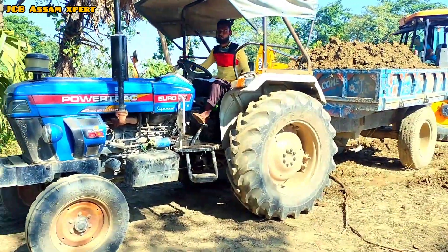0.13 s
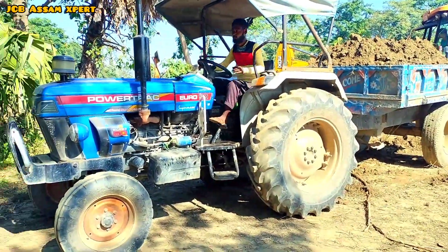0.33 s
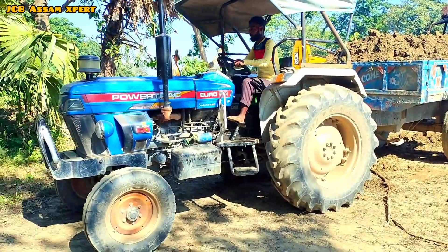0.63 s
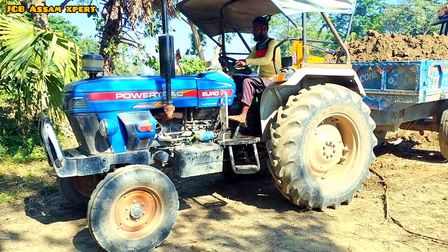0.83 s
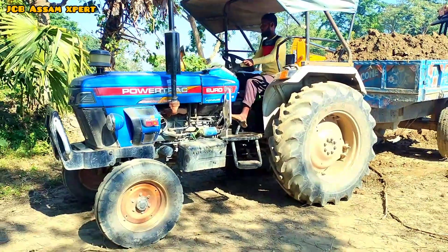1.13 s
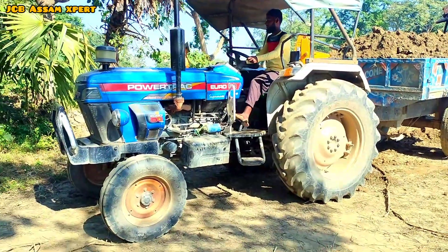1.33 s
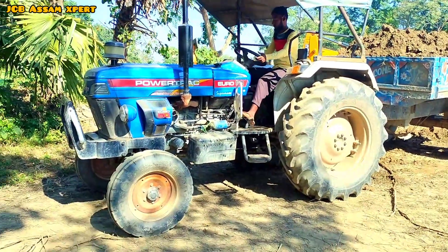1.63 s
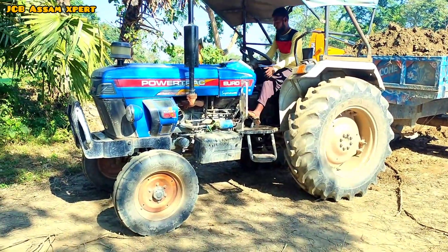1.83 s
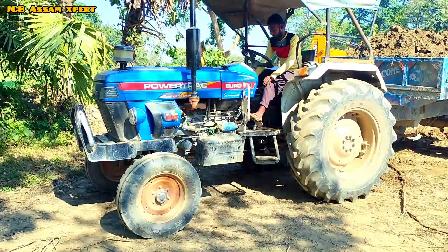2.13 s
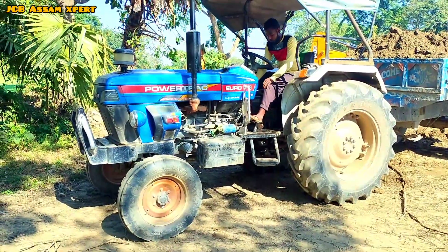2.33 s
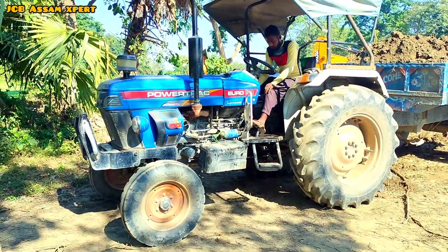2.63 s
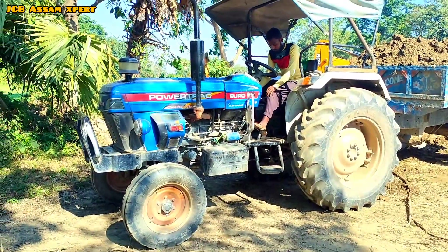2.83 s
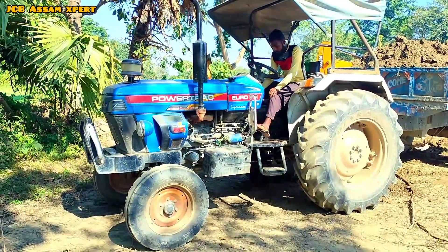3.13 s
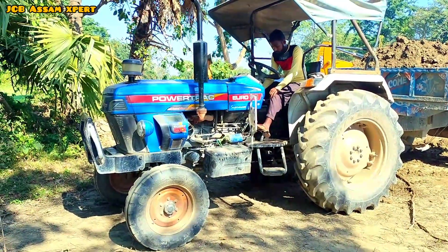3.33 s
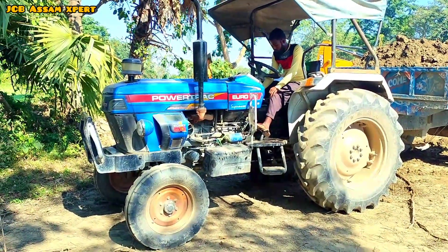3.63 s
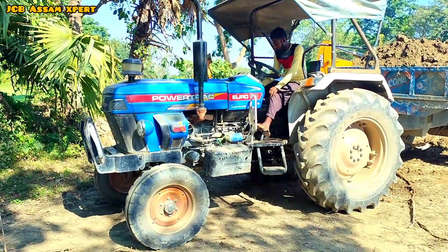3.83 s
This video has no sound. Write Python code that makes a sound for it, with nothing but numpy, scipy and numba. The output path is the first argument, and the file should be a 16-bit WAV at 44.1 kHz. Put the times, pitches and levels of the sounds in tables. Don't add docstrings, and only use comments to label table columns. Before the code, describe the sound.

A diesel tractor is started in an open yard, heard from a few metres. From 0 to 1.8 s, levers and sheet metal knock and scrape irregularly over a faint far machine's thuds and whine, with tiny squeaks. A quieter gap follows. At 2.7 s a solenoid slams; the starter whine climbs, then sags by 3.0. From 3.1 s loud exhaust bangs, hissing puffs and clanks quicken, easing around 3.55 into lumpy idle.

```python
import sys
import numpy as np
from scipy import signal
from scipy.fft import rfft, irfft, next_fast_len
from scipy.io import wavfile
from scipy.ndimage import uniform_filter1d
from numba import njit

SR = 44100
rng = np.random.default_rng(int(sys.argv[2]) if len(sys.argv) > 2 else 0)


def file_out(sig):
    cols = np.atleast_2d(sig).T
    lim = np.clip(cols, -1, 1)
    pcm = np.round(lim * 32767).astype(np.int16)
    wavfile.write(sys.argv[1], SR, pcm)


def boost(x):
    u = np.asarray(x, float) / 20
    return 10 ** u


N = 176400
T = np.arange(N) / SR

# start_s, peak_db
FAR_THUDS = [(0.154, -46), (0.357, -55), (0.552, -49), (0.799, -42), (1.071, -57), (1.159, -46),
             (1.339, -58), (1.491, -43), (1.686, -41), (1.838, -44), (1.947, -42), (2.048, -43),
             (2.271, -47)]
# centre_hz, width_hz, level_db
FAR_WHINE = [(680, 89, -70), (1140, 90, -75.5), (1433, 66, -78), (1766, 92, -73.5)]
# time_s, pitch_hz, level_db
FAR_TONE = [
    (1.82, 1144, -88),
    (1.9, 1120, -69),
    (2.25, 1054, -71.5),
    (2.32, 1110, -73),
    (2.7, 1087, -77),
]
# freq_hz, density_db (per Hz)
YARD_COLOUR = [(15, -32), (25, -6.5), (59, 0.5), (420, -25.5), (863, -25.5), (1900, -33), (2600, -40),
               (16000, -45)]
YARD_DB, YARD_PAN_DB = -49.5, 1.2

# start_s, peak_db, brightness_db
RATTLES = [(0.089, -33.5, -18), (0.239, -56.5, 2.5), (0.327, -55, 5.5), (0.354, -29.5, -16.5),
           (0.378, -33, -38), (0.437, -37.5, -21), (0.539, -44, -25), (0.588, -40, -12), (0.664, -45.5, 2),
           (0.7, -32.5, -8), (0.74, -32, -7), (0.816, -26.5, -17), (0.861, -33, -44), (0.899, -45, 3.5),
           (0.94, -35.5, -5), (0.972, -32.5, -21), (1.048, -30, -19), (1.079, -23, -20), (1.168, -27, -60),
           (1.37, -32, -46), (1.405, -37, -37), (1.434, -55, 4.5), (1.473, -46, -6), (1.509, -37.5, -7.5),
           (1.571, -33.5, -11.5), (1.669, -37.5, 1), (1.702, -33.5, -18)]
# time_s, level_db
EFFORT = [(0, -66.5), (.3, -62.5), (.4, -54), (.5, -63), (.64, -71), (.7, -50), (1.2, -47.5), (1.27, -67),
          (1.36, -60), (1.4, -56.5), (1.72, -62), (1.85, -66)]
# centre_hz, width_hz, level_db
BODY = [(237, 89, -5.5), (523, 570, -4.5), (720, 53, -2), (1150, 55, -17.5), (1860, 55, -14)]
# centre_hz, width_hz, level_db
LINKAGE = [(1315, 56, 0), (1800, 51, -2), (2350, 130, -9.5), (3110, 76, -16), (3480, 83, -14),
           (4320, 35, -14), (7100, 69, -25)]
# start_s, peak_db, ring_hz
PANEL_BLOWS = [(.091, -44, 564), (.381, -34, 678), (.704, -41.5, 1766), (.745, -52, 740), (.82, -33, 647),
               (.822, -35.5, 351), (.863, -33, 682), (.973, -34, 720), (1.05, -34.5, 680),
               (1.079, -33, 720), (1.09, -33, 530), (1.171, -42, 736), (1.2, -42, 962), (1.372, -41, 396),
               (1.402, -43, 738), (1.575, -47.5, 1796), (1.672, -43, 560), (1.682, -31.5, 333),
               (1.705, -40.5, 758)]
RATTLE_ATTACK_S = 0.005

# start_s, length_s, from_hz, to_hz, level_db
SQUEAKS = [
    (.595, .06, 3600, 3550, -70),
    (1.31, .04, 4200, 4250, -71),
    (1.94, .1, 6200, 7900, -81),
    (2.04, .12, 8000, 7000, -80),
    (2.27, .03, 3900, 3200, -79),
    (2.36, .03, 3800, 2700, -78),
    (2.4, .03, 4500, 3000, -78),
]

# start_s, peak_db, decay_s
ENGAGING = [
    (2.709, -30.5, 0.0075),
    (2.713, -23.5, 0.024),
    (2.73, -11.5, 0.018),
]
# start_s, peak_db
LURCHES = [
    (2.76, -18),
    (2.77, -18.5),
    (2.779, -20),
    (2.795, -18),
    (2.81, -20),
    (2.83, -34),
]
# time_s, gear_mesh_hz, whine_db, clatter_db
STARTER = [(2.731, 700, -34.5, -28), (2.785, 770.6, -20.5, -26.5), (2.81, 850, -26.5, -25),
           (2.86, 1031, -24, -23), (2.915, 1250, -28, -21.5), (2.958, 1038, -18.5, -21.5),
           (2.973, 915, -15, -26), (2.982, 842, -16.5, -26.5), (2.992, 790, -13.5, -26),
           (3.015, 680, -36, -28), (3.16, 644, -66, -29)]
# centre_hz, width_hz, level_db
HOUSING = [(790, 170, 9), (1450, 117, 6), (1940, 88, -6), (3260, 250, -11.5), (4010, 150, -8),
           (4560, 90, -16), (5470, 200, -17), (6550, 260, -11.5)]
SNAGS_S = (2.803, 2.824)
SNAG_WIDTH_S, SNAG_DB = 0.0022, 12.5
GEAR_RING_HZ, GEAR_RING_WIDTH_HZ, GEAR_ROUGH_DB, TEETH_DB = 830, 500, 2.5, -12

# crest_s, thump_db, puff_db
BEATS = [(3.139, -19.5, -21), (3.258, -14.5, -7.5), (3.343, -11, -4), (3.416, -10, -7), (3.479, -10.5, -11),
         (3.547, -26, -29.5), (3.591, -22, -35), (3.661, -25, -35.5), (3.729, -16, -21.5),
         (3.792, -21, -54), (3.857, -14.5, -22), (3.915, -16.5, -29)]
# centre_hz, width_hz, level_db
STACK = [(2510, 81, -0.5), (2747, 38, 1), (3160, 55, -6), (3380, 75, -11), (4160, 180, -13),
         (5360, 130, -17), (6200, 48, -18), (7080, 160, 4)]
THUMP_HZ, THUMP_WIDTH_S = 55.6, 0.0086
PUFF_LEAD_S, PUFF_ATTACK_S, PUFF_DECAY_S = 0.013, 0.007, 0.0058
# start_s, peak_db, brightness_db
KNOCKS = [(3.161, -6.5, -4.5), (3.212, -18, 4.5), (3.267, -9.5, -9), (3.348, -9.5, -36), (3.419, -9.5, -37),
          (3.599, -25, -9), (3.665, -16.5, -26), (3.73, -21.5, -31), (3.795, -11, -47), (3.853, -17, -38),
          (3.915, -20, -29), (3.978, -33, -29)]
# centre_hz, width_hz, level_db
BLOCK = [(128, 11, 0), (330, 18, 11.5), (495, 11, 6.5), (676, 116, 5), (860, 45, -6), (1350, 84, 1),
         (1890, 160, -16), (2430, 19, -21)]
KNOCK_ATTACK_S, KNOCK_DECAY_S = 0.004, 0.026
# start_s, peak_db, ring_hz
CLANKS = [(3.158, -24, 1953), (3.166, -17, 775), (3.216, -27, 1450), (3.249, -20.5, 2614),
          (3.272, -19.5, 1385), (3.274, -27, 2450), (3.285, -17, 330), (3.334, -15, 1596),
          (3.351, -19.5, 2525), (3.358, -15, 940), (3.402, -19, 2350), (3.414, -29, 3100),
          (3.422, -17, 1333), (3.43, -19.5, 637), (3.45, -16.5, 630), (3.606, -32, 320),
          (3.669, -27.5, 1385), (3.685, -20.5, 343), (3.733, -25, 650), (3.796, -14.5, 630),
          (3.806, -19.5, 247), (3.865, -16, 330), (3.9, -21.5, 283), (3.92, -29, 640), (3.978, -33, 330)]
# time_s, level_db
RUNNING = [
    (3.1, -29),
    (3.45, -18),
    (3.55, -24),
    (4, -24.5),
]
# freq_hz, density_db (per Hz)
RUMBLE = [(15, -35), (25, -33), (55, -3), (427, -12), (641, -13), (1100, -17.5), (4000, -32),
          (16000, -55.5)]

SPREAD_HZ, SCATTER_S = 3660, 0.025
YARD_T60_S, YARD_WET_DB = 0.26, -11
# freq_hz, gain_db
MIC = [(6000, -1), (7600, -2), (9200, -9), (12500, -2), (16000, -2)]


@njit
def svf(x, hz, width):
    y, band, low = np.empty(len(x)), 0., 0.
    g, k = np.tan(np.pi * hz / SR), width / hz
    for i in range(len(x)):
        v = (band + g * (x[i] - low)) / (1 + g * (g + k))
        band, low, y[i] = 2 * v - band, low + 2 * g * v, k * v
    return y


def unit(x):
    return x / np.sqrt(np.mean(x ** 2))


def noise(hz, width):
    return unit(svf(rng.standard_normal(N), 1. * hz, 1. * width))


def grit(scatter_db):
    size_db = scatter_db * np.minimum(rng.exponential(size=N), 5)
    return unit(rng.standard_normal(N) * boost(size_db))


def walk(rate):
    hold = int(SR / rate)
    steps = np.repeat(rng.standard_normal(N // hold + 1), hold)
    return 1.5 * uniform_filter1d(uniform_filter1d(steps, hold), hold)[:N]


def curve(rows, column=1):
    return np.interp(T, [r[0] for r in rows], [r[column] for r in rows])


def bursts(times, dbs, decays, attack):
    out = np.zeros(N)
    for start, db, decay in zip(times, dbs, np.broadcast_to(decays, len(times))):
        i = int(start * SR) + 1
        u = T[i:i + SR // 2] - start
        out[i:i + SR // 2] += boost(db) * (1 - np.exp(-u / attack)) * np.exp(-u / max(decay, .001))
    return out


def thumps(rows, hz, width):
    out = np.zeros(N)
    for r in rows:
        centre = int(r[0] * SR)
        i = slice(max(centre - SR // 10, 0), centre + SR // 10)
        u = T[i] - r[0]
        out[i] += boost(r[1]) * np.cos(2 * np.pi * hz * u) * np.exp(-(u / width) ** 2 / 2)
    return out


def ring(x, peaks, widen, broad_db, broad_hz):
    def wide(v):
        return svf(v, 1. * broad_hz, 2.09 * broad_hz)

    def metal(v):
        modes = sum(boost(db) * svf(v, 1. * hz, widen * width) for hz, width, db in peaks)
        return wide(boost(broad_db) * wide(v) + modes)

    return metal(x) / np.std(metal(rng.standard_normal(20000)))


def coloured(points, flicker_db, rate):
    hz, db = np.array(points).T
    out = np.zeros(N)
    for f in 28 * 2 ** np.arange(0, 9.3, .5):
        level = boost(np.interp(np.log(f), np.log(hz), db) + flicker_db * walk(rate))
        out += level * svf(svf(rng.standard_normal(N), f, f / 2), f, f / 2)
    return unit(out)


def panels(rows, width, attack, decay):
    out, u = np.zeros(N + SR), np.arange(SR // 8) / SR
    push = (1 - np.exp(-u / attack)) ** 2 * np.exp(-u / decay)
    for (start, db, hz), rough in zip(rows, rng.standard_normal((len(rows), len(u)))):
        strike = rough + np.sin(2 * np.pi * hz * u) / 10
        tone = unit(svf(strike, 1. * hz, width * np.sqrt(hz)))
        i = int(start * SR)
        out[i:i + len(u)] += boost(db) * push * tone
    return out[:N]


def yard():
    air = boost(YARD_DB - 5.5) * coloured(YARD_COLOUR, flicker_db=2.0, rate=8.75)
    whine = sum(boost(db + 3.5 * walk(4.8)) * noise(hz, width) for hz, width, db in FAR_WHINE)
    tone_level = boost(curve(FAR_TONE, column=2) + 4.5 + 5.5 * walk(18))
    tone_hz = curve(FAR_TONE) + 8 * walk(22)
    tone = tone_level * np.sin(2 * np.pi * np.cumsum(tone_hz) / SR)
    crests = [(s + 0.0175, db) for s, db in FAR_THUDS]
    return air + tone + whine + thumps(crests, hz=51.7, width=0.0064)


def rattles():
    s, db, bright = np.array(RATTLES).T
    scrape = boost(curve(EFFORT) + 2.5 * walk(39.2)) * (T < EFFORT[-1][0])
    knocks = bursts(s, db - 5.5, 0.0084, RATTLE_ATTACK_S)
    low = ring((knocks + scrape) * grit(2.94), BODY, widen=0.95, broad_db=-34, broad_hz=704)
    jingle = bursts(s, db + bright - 1.5, 0.016, RATTLE_ATTACK_S) + boost(-15.5) * scrape
    high = jingle * ring(grit(1.2), LINKAGE, widen=1.9, broad_db=-13, broad_hz=3640)
    return low + high + panels(PANEL_BLOWS, width=2.8, attack=0.001, decay=0.011)


def squeaks():
    out = np.zeros(N)
    for start, length, hz0, hz1, db in SQUEAKS:
        u = np.clip((T - start) / length, 0, 1)
        swell = np.sqrt(np.sin(np.pi * u) + 1e-9) * (u < 1) * (u > 0)
        cycles = length * (hz0 * u + (hz1 - hz0) * u ** 2 / 2)
        out += boost(db) * swell * np.sin(2 * np.pi * cycles)
    return out


def engaging():
    s, db, decay = np.array(ENGAGING).T
    return bursts(s, db - 10.5, decay, 0.0002) * (noise(6740, 2200) + boost(5.5) * noise(860, 670))


def starter():
    on = np.clip((T - STARTER[0][0]) / 0.0028, 0, 1) * np.clip((3.23 - T) / 0.0087, 0, 1)
    phase = 2 * np.pi * np.cumsum(curve(STARTER) * (1 + 0.033 * walk(300))) / SR
    catches = sum(np.exp(-((T - s) / SNAG_WIDTH_S) ** 2 / 2) for s in SNAGS_S)
    whine_level = boost(curve(STARTER, column=2) + 4.5 + GEAR_ROUGH_DB * walk(250))
    whine = whine_level * (1 + boost(SNAG_DB) * catches) * np.sin(phase)
    whine = svf(whine, 1. * GEAR_RING_HZ, 1. * GEAR_RING_WIDTH_HZ)
    teeth = sum(boost(5.0 * walk(90)) * np.cos(k * phase) for k in range(2, 7))
    teeth = boost(TEETH_DB) * teeth * np.clip((3.02 - T) / 0.038, 0, 1)
    level = boost(curve(STARTER, column=3) + 1.55 * walk(110))
    clatter = ring(level * (grit(2.3) + teeth), HOUSING, widen=1.1, broad_db=-23, broad_hz=2850)
    low_noise = noise(200, 340) + boost(-10.5) * noise(42, 60) * (T > 2.9)
    groan = level * boost(-5.5 + 2 * walk(30.38)) * low_noise
    return on * (whine + clatter + groan) + thumps(LURCHES, hz=132, width=0.0041)


def exhaust():
    s, _, puff_db = np.array(BEATS).T
    pipe = ring(grit(1.5), STACK, widen=1.1, broad_db=-5.5, broad_hz=2820)
    jet = noise(7340, 980) + boost(3.5) * pipe + boost(-1.5) * noise(10440, 4500)
    puffs = bursts(s - PUFF_LEAD_S, puff_db - 3, PUFF_DECAY_S, PUFF_ATTACK_S) * jet
    return thumps(BEATS, THUMP_HZ, THUMP_WIDTH_S) + puffs


def engine():
    s, db, bright = np.array(KNOCKS).T
    blows = bursts(s, db - 5.5, KNOCK_DECAY_S, KNOCK_ATTACK_S) * grit(3.5)
    knocks = ring(blows, BLOCK, widen=1.28, broad_db=-18.5, broad_hz=1110)
    rasp_tone = ring(grit(4.8), STACK, widen=1.1, broad_db=15, broad_hz=2230)
    rasp = bursts(s, db + bright - 4.5, 0.012, 0.0025) * rasp_tone
    tinwork = panels(CLANKS, width=4., attack=0.00089, decay=0.013)
    lumps = .5 + bursts(s, 0 * db, .03, .004)
    run_level = boost(curve(RUNNING)) * lumps * np.clip((T - 3.11) / 0.038, 0, 1)
    run = run_level * coloured(RUMBLE, flicker_db=0.5, rate=49)
    return knocks + tinwork + rasp + run


def ports(x):
    size = next_fast_len(N + SR)
    hz = np.arange(size // 2 + 1) * SR / size
    share = np.clip(hz / SPREAD_HZ, 0, .95) ** 0.85 + 1 / 30
    u = np.arange(SR // 2) / SR
    scatter = rng.standard_normal(len(u)) * np.exp(-u / SCATTER_S)
    tail = rng.standard_normal(len(u)) * np.exp(-np.log(1000) * u / YARD_T60_S) * (u > .006)
    spec = rfft(x, size)
    mid = spec * (1 + boost(YARD_WET_DB) * rfft(tail / np.linalg.norm(tail), size))
    side = spec * share * rfft(scatter / np.linalg.norm(scatter), size)
    return irfft(np.array([mid + side, mid - side]), size)[:, :N]


def scene():
    pan = boost(YARD_PAN_DB * np.array([[-1], [1]]) / 2)
    surroundings = ports(yard() + rattles() + squeaks()) * pan
    return surroundings + ports(engaging() + starter()) + ports(exhaust() + engine())


def low_pass(x):
    return signal.sosfilt(signal.butter(12, 16200, fs=SR, output="sos"), x)


def record(dry):
    hz, db = np.array(MIC).T
    f = np.arange(N // 2 + 1) * SR / N
    gain = boost(np.interp(f, hz, db)) * (f < 16150)
    mix = irfft(rfft(dry) * gain, N)
    return low_pass(mix)


dry = scene()
out = record(dry)
file_out(out)
```